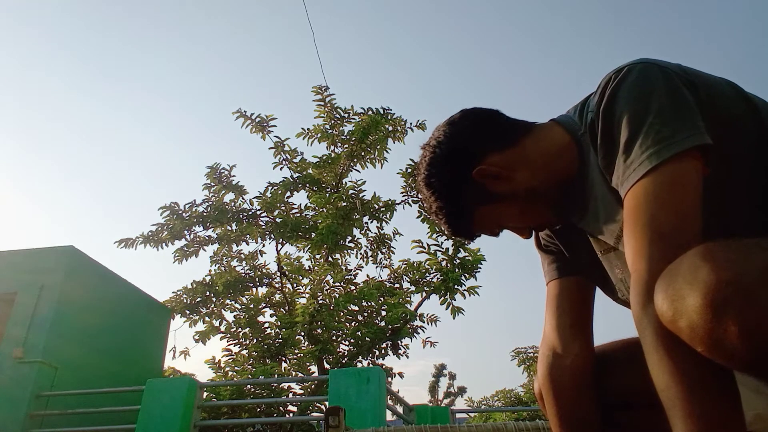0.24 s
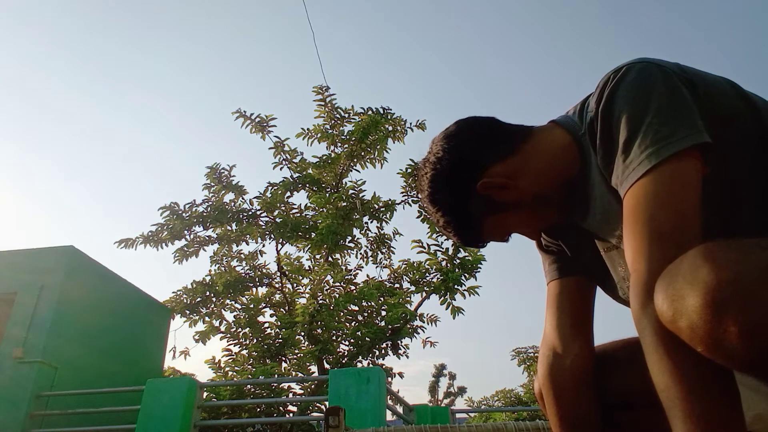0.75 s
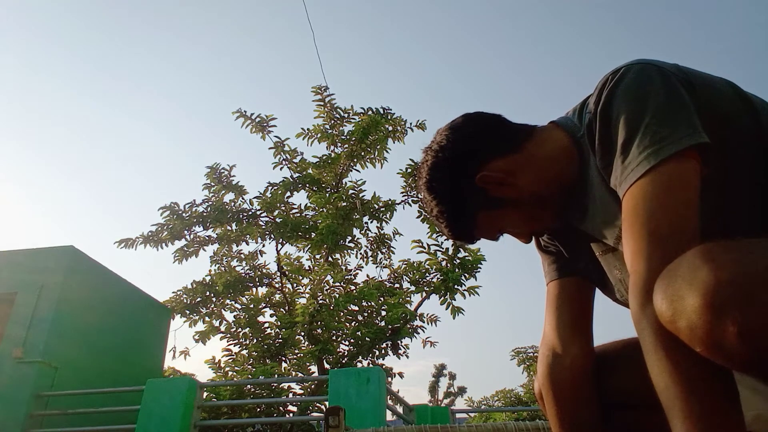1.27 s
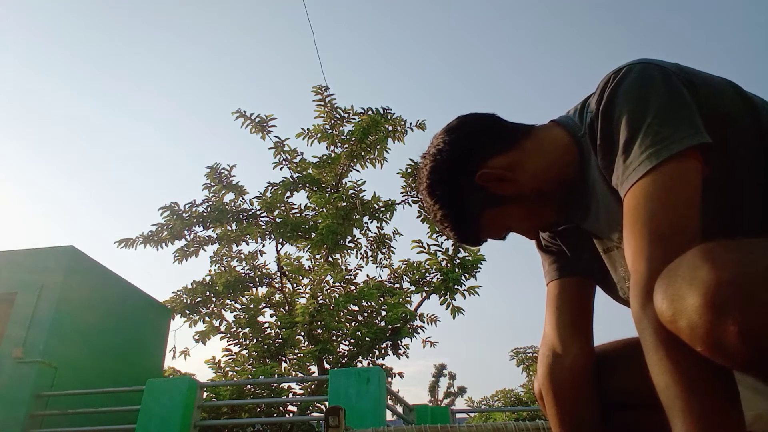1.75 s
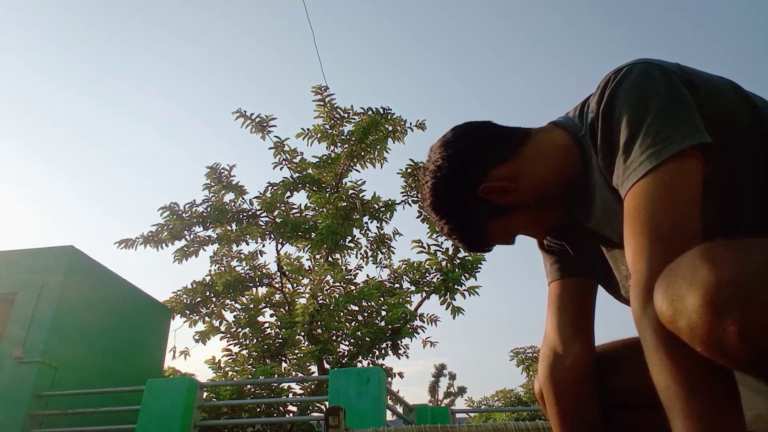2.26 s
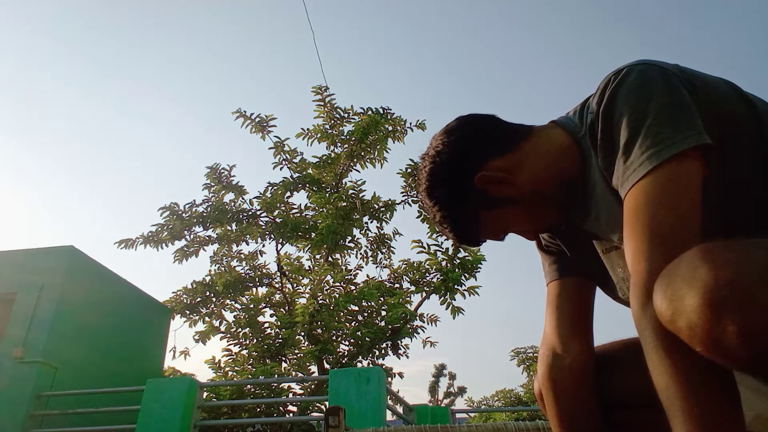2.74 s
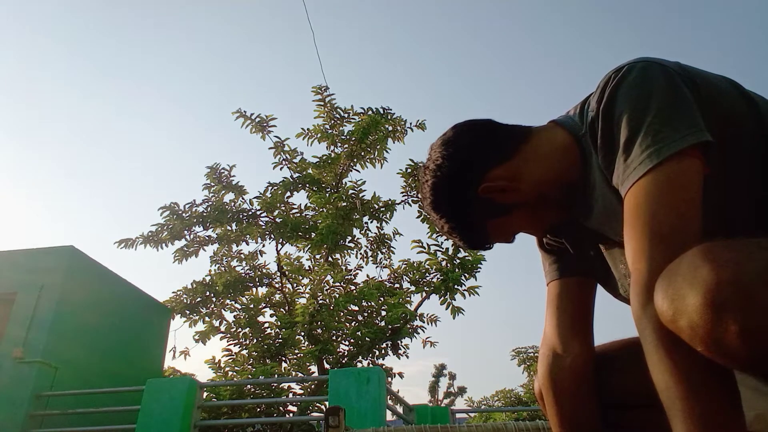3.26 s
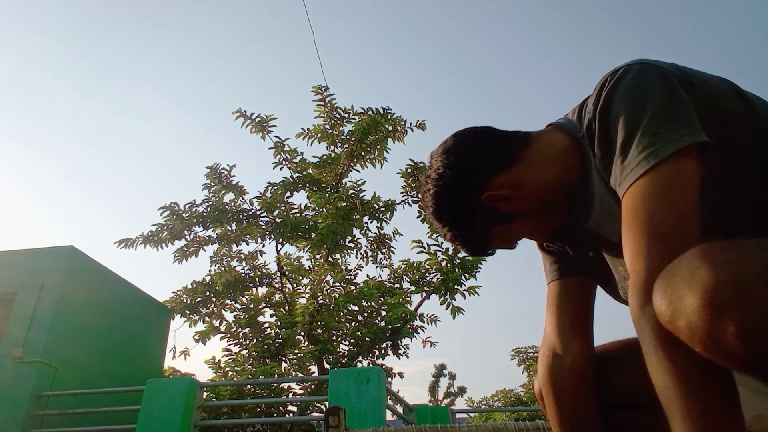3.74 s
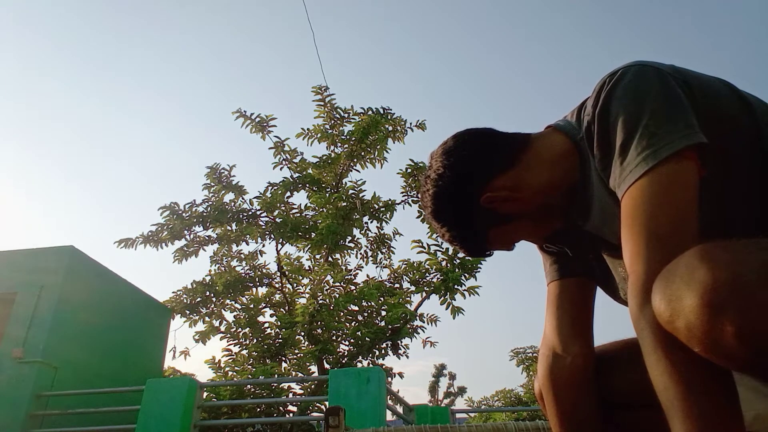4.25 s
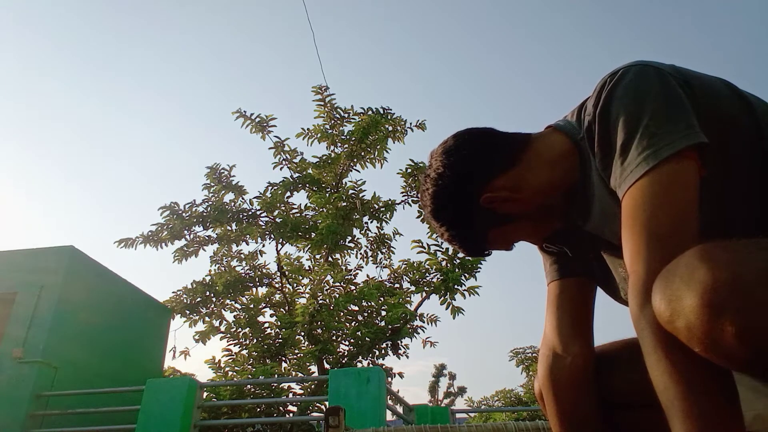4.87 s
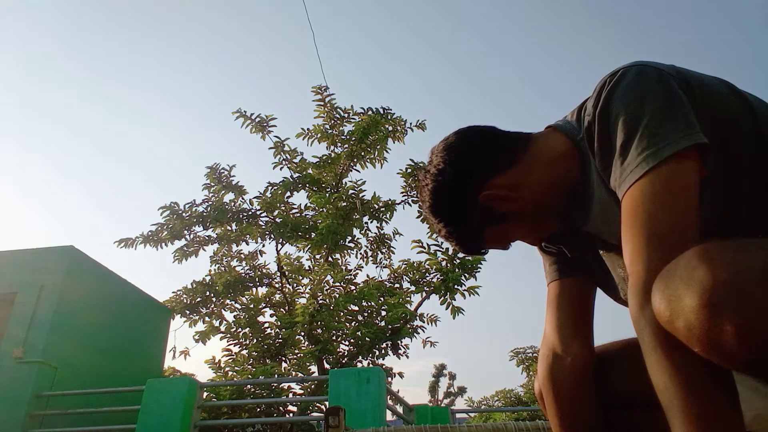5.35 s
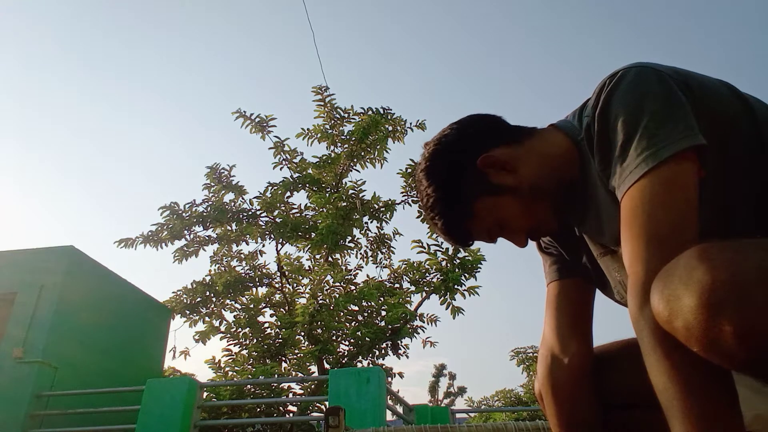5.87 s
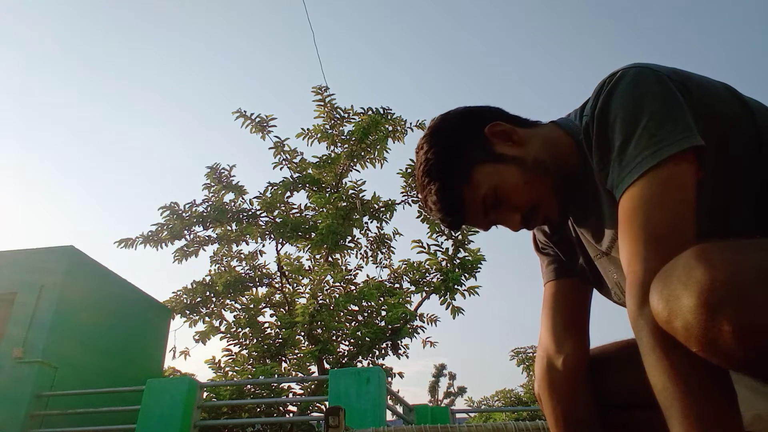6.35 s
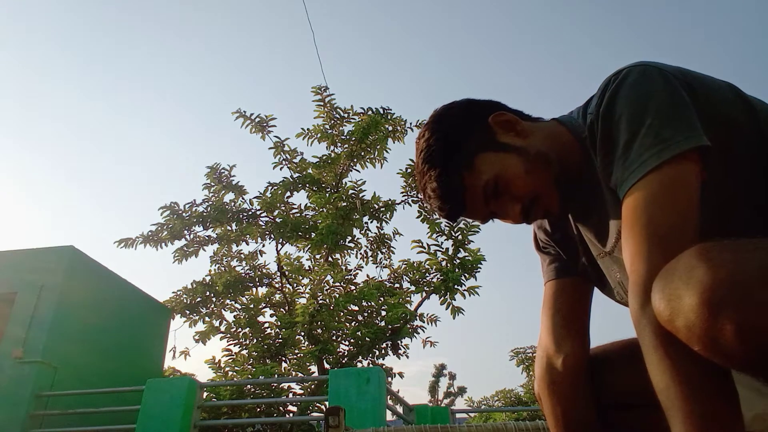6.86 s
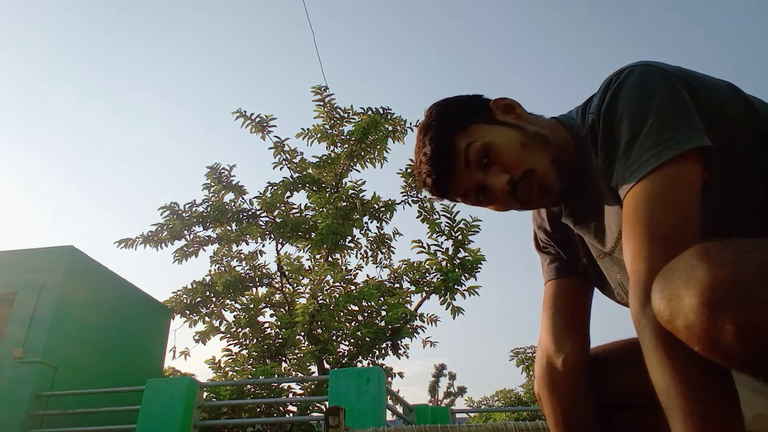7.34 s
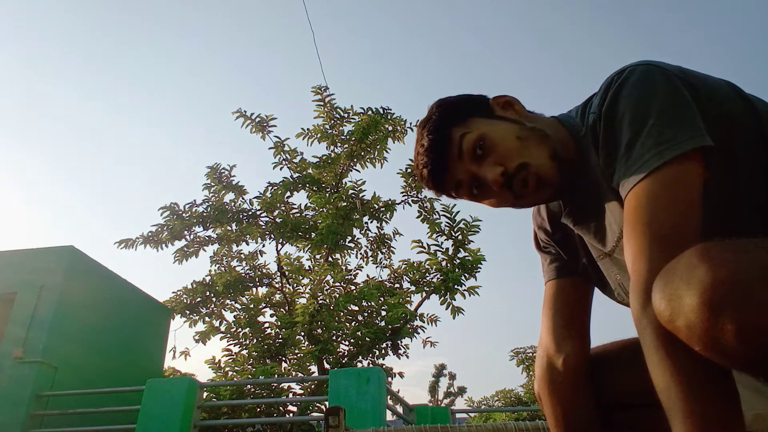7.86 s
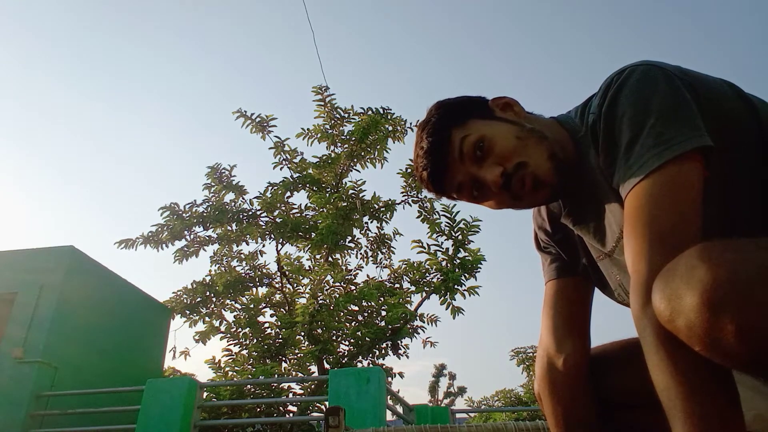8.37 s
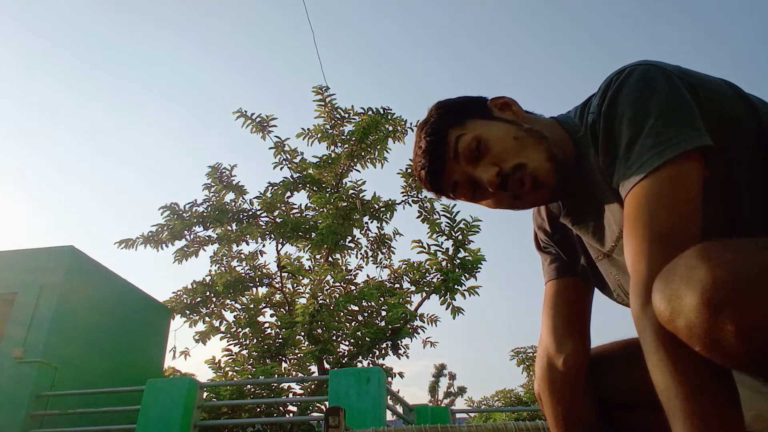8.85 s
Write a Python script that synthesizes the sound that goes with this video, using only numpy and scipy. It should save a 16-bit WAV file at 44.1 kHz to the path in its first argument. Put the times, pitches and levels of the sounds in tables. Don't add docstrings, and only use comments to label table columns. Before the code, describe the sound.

Phone microphone near the floor of an open terrace: a loud koel dominates, whooping upward from low to higher notes in four separate groups, with wall slap and reverberation from houses. Between groups, distant chirps, falling whistles and blurred chatter show through a quiet, steady bed of town rumble and airy hiss. One soft thud comes midway, a faint dove coos later, and brief hand scuffs close the scene.

```python
import sys
import numpy as np
from scipy import signal
from scipy.fft import next_fast_len
from scipy.io import wavfile
from scipy.ndimage import uniform_filter1d

SR = 44100
rng = np.random.default_rng(int(sys.argv[2]) if len(sys.argv) > 2 else 0)


def file_out(sig):
    cols = np.atleast_2d(sig).T
    lim = np.clip(cols, -1, 1)
    pcm = np.round(lim * 32767).astype(np.int16)
    wavfile.write(sys.argv[1], SR, pcm)


def gain_from_db(level_db):
    decades = np.asarray(level_db, float) / 20
    return 10 ** decades


N = 401751
LEAD = 13230
WARM = 4000

# (frequency [Hz], density [dB per Hz])
RUMBLE = [(15, -71), (25, -30), (33, -39.5), (48, -28), (51, -22.5), (61, -21), (81, 2.5), (129, -10.5),
          (166, -5.5), (195, -13.5), (221, -14), (261, -13), (500, -19), (650, -43.5), (1100, -120)]
# (time [s], level [dB rms])
RUMBLE_DB = [(0.0, -51.5), (0.46, -56), (0.58, -51.5), (5.96, -50.5), (7.0, -56), (7.15, -51.5),
             (8.37, -55.5), (8.98, -48.5), (9.11, -55)]
# (frequency [Hz], density [dB per Hz])
HAZE = [(250, -34.5), (400, -5), (600, -1.5), (1200, -7), (2500, -8.5), (3700, -15.5), (4600, -22.5),
        (5000, -26), (6300, -43), (7300, -37), (8300, -34.5), (9200, -40.5), (12000, -46.5), (15500, -46)]
# (time [s], level [dB rms])
HAZE_DB = [(0.0, -59), (9.11, -58)]

# (time [s], length [s], centre [Hz], width
# [Hz], level [dB rms])
RUSTLES = [(.5, 0.69, 4516, 828, -65.5), (1.26, 0.35, 2810, 1230, -58), (1.28, 0.35, 4900, 1120, -67.5),
           (1.3, 0.43, 7540, 1530, -75), (1.698, 0.32, 3300, 1750, -54.5), (2.172, 0.042, 6150, 2010, -68),
           (2.174, 0.2, 4530, 1223, -63), (3.049, 0.27, 2440, 1800, -65), (3.561, 0.31, 2170, 1710, -53),
           (4.26, 1, 2670, 1580, -66.5), (4.423, 0.47, 543.4, 79, -57.5), (4.428, 0.47, 759, 120, -58.5),
           (4.45, 0.2, 378, 122.2, -66), (4.97, 0.12, 4470, 1400, -58.5), (5.362, 0.15, 4300, 1600, -63),
           (5.754, 0.36, 2260, 1820, -56), (5, .4, 8200, 800, -84), (3.201, 0.31, 4630, 300, -78),
           (4.552, 0.45, 3270, 200, -66.5), (4.35, 0.74, 2104, 200, -66.5),
           (8.604, 0.48, 8100, 1986, -74.5)]
# (time [s], length [s], first pitch [Hz], last pitch [Hz], level [dB])
HIGH_BIRD = [
    (2.36, 0.18, 4190, 3887, -53.5),
    (3.6, .06, 4243, 3974, -60),
    (5.65, .17, 4180, 3855, -55.5),
    (8.27, 0.18, 4350, 3700, -52.5),
]
MIDDLE_BIRD = [
    (.975, .17, 3550, 3620, -53.5),
    (1.15, 0.16, 3226, 3070, -58.5),
]
LOW_BIRD = [
    (.56, 0.13, 2095, 2447, -49.5),
    (.92, 0.081, 2353, 2500, -58.5),
    (1.45, 0.2, 1737, 1930, -65),
    (1.58, 0.18, 1975, 2516, -55),
    (1.74, 0.13, 2330, 2170, -58.5),
    (2.3, 0.24, 1728, 2345, -55.5),
    (2.5, 0.17, 2516, 2700, -60),
    (2.63, 0.16, 2550, 2120, -63.5),
]
CHIRP = [
    (2.19, 0.037, 4840, 3330, -52),
    (2.23, 0.047, 3270, 2270, -53),
    (2.29, 0.12, 2280, 2185, -59),
    (2.18, 0.045, 4900, 4830, -54),
    (2.19, 0.0705, 2500, 2390, -57),
    (5.0, .1, 4307, 2570, -55.5),
]
THIN_BIRD = [
    (.55, 0.45, 4250, 3560, -71.5),
    (7.4, .1, 4100, 3400, -71),
    (7.14, 0.084, 2570, 2540, -58.5),
    (3.085, .07, 2700, 2940, -56),
]
DOVE = [
    (6.88, .4, 743, 723, -60.5),
    (7.8, .2, 695, 735, -59.5),
]
INSECT = [
    (1.6, .3, 8170, 8360, -74),
    (2.78, .3, 8300, 8300, -87),
    (3.36, 0.21, 8380, 8330, -87),
    (5.1, .2, 8300, 8300, -89),
]
SWELL, FADE_DB = 0.6, -7.5

# (time [s], length [s], level [dB rms], extra thud [dB])
SCUFFS = [
    (5.565, 0.083, -60, 9.5),
    (8.657, 0.057, -55.5, -19),
    (8.797, 0.032, -46, -16),
    (8.821, 0.042, -38.5, -6),
    (8.861, 0.063, -54, -6),
    (8.973, .024, -46.5, -2.5),
    (8.992, 0.059, -55, 3),
]
# (centre [Hz], width [Hz], level [dB])
SCUFF_BANDS = [
    (422, 360, 3),
    (2500, 3300, 2),
    (8000, 2200, -17),
    (11500, 8000, -22),
]

# (time [s], time to peak [s], first hump [Hz], peak [Hz], first hump effort [dB])
NOTES = [(-0.155, 0.1, 1213, 1420, -0.5), (0.078, 0.12, 1300, 1437, -1), (0.322, 0.12, 1366, 1466, 0),
         (3.553, .118, 750, 1225, -3), (3.785, 0.11, 1110, 1338, 0.5), (4.022, 0.12, 1265, 1406, -0.5),
         (5.717, 0.12, 821.7, 1259, 2), (5.955, 0.11, 1142, 1381, 1), (6.185, 0.11, 1297, 1445, 1),
         (6.424, .113, 1362, 1483, -1), (6.672, 0.11, 1395, 1513, -2), (7.582, .117, 1069, 1382, 0.5),
         (7.82, 0.12, 1335, 1498, -2), (8.071, .12, 1433, 1518, -6)]
# (time [s], length [s], first pitch [Hz], last pitch [Hz], level [dB])
HOARSE = [
    (3.55, 0.1, 1209, 1122, -43.5),
    (3.55, 0.11, 971, 896, -39.5),
    (5.72, .025, 1003, 1252, -46),
    (5.77, .04, 1030, 1326, -43),
    (7.6, .07, 3310, 3250, -56.5),
    (7.58, 0.088, 2870, 2760, -61),
]
CLEAR = [
    (7.6, 0.056, 1290, 1190, -25),
    (7.59, .08, 800, 800, -41),
    (7.569, 0.04, 760, 1100, -37.5),
    (3.7, .05, 830, 790, -33),
    (5.88, 0.062, 850, 800, -36),
]
# (frequency [Hz], fundamental [dB rms])
PIPE = [(650, -50.5), (850, -26), (1050, -25.5), (1200, -16.5), (1350, -12.5), (1500, -9)]
OVERTONES_DB = [-34.5, -38.5, -37, -31, -46, -46, -47.5, -50.5, -53, -51.5, -51.5, -56.5]
# (frequency [Hz], level [dB])
BEAK = [(1900, 1), (2030, 11), (2200, -9.5), (2420, -5), (2580, -22), (2820, 1), (3000, -5), (3300, 6.5),
        (3600, -0.5), (4200, -12.5), (5000, 2.5)]
WAVER, RASP_DB = .0015, 1.5
CLOSING_DB, DULL_BELOW_HZ = .27, 1060

ONSET, ONSET_S, SLIDE = .87, .013, .95
ONSET_DB, HUMP_S, HUMP_DB = -6.5, .036, 0.45
DIP, DIP_LEAD_S, DIP_DB = .925, 0.04484, 1.5
CREST, CREST_S = 0.95, .014
CLIMB_DB, PEAK_DB, BEND_DB, END_DB = -1, 1, 0.94, 7
BEND, BEND_AT, END = .84, .6, .67
FALL_S, FALL_PIVOT_HZ, FALL_S_PER_KHZ = .066, 1460, .125
LEAP_DB, CARRY = -11.5, 0.48

WALL_NOTCH_HZ = 1273.4
# (delay [s], level [dB])
ECHOES = [
    (0.0157, -29),
    (0.0218, -20.5),
    (0.034, -19),
    (0.047, -19.5),
    (0.072, -23.5),
]
# (frequency [Hz], time to fall 60 dB [s])
TAIL = [(820, 0.34), (980, 0.9), (1250, 0.65), (1480, .8), (2800, 0.5), (5500, 0.47), (8000, 0.59),
        (11000, 0.48)]
# (frequency [Hz], level [dB])
PORT = [(4350, -1.5), (4750, -12.5), (5500, -2.5), (7300, -11.5), (7700, -3), (8400, -2), (9200, -7.5),
        (10500, -2), (11700, -15), (13000, -13.5), (13700, 3), (15500, 3)]
KNEE_DB, EDGE_HZ = -2.5, 15500


def read(points, hz):
    f, value = np.transpose(points)
    return np.interp(np.log(hz + 1), np.log(f + 1), value)


def evened(x):
    return x / np.sqrt(np.mean(x ** 2) + 1e-20)


def add(mix, s, sound):
    part = mix[round(s * SR) + LEAD:][:len(sound)]
    part += sound[:len(part)]


def rounded(x, size):
    once = uniform_filter1d(x, size, mode="nearest")
    return uniform_filter1d(once, size, mode="nearest")


def drift(noise, size):
    return evened(uniform_filter1d(uniform_filter1d(noise, size), size))


def fuzz(hz, width_hz, noise, order=3):
    lowpass = signal.butter(order, width_hz / 2, fs=SR, output="sos")
    slow = signal.sosfilt(lowpass, noise[0] + 1j * noise[1])
    carrier = np.exp(2j * np.pi * np.cumsum(hz) / SR)
    return evened((slow * carrier).real)


def hazed(x, wet_db, t60):
    haze = rng.standard_normal(SR // 2) * gain_from_db(-60 * np.arange(SR // 2) / SR / t60)
    return x + gain_from_db(wet_db) * signal.oaconvolve(x, haze / np.linalg.norm(haze))[:len(x)]


def wash(colour, level, size, patchy_db):
    frames = 4 * N // size + 5
    hz = np.fft.rfftfreq(size, 1 / SR)
    a, b, patches = rng.standard_normal((frames, len(hz), 3)).T
    patches = uniform_filter1d(patches, 10, 0)
    patches = evened(uniform_filter1d(patches, 16384 // size, 1))
    z = (a + 1j * b) * gain_from_db(read(colour, hz)[:, None] + patchy_db * patches)
    noise = evened(signal.istft(z, nperseg=size, noverlap=3 * size // 4)[1][:N])
    return noise * gain_from_db(np.interp(np.arange(N) / SR, *np.transpose(level)))


def town():
    rumble = wash(RUMBLE, RUMBLE_DB, size=4096, patchy_db=1.0)
    haze = wash(HAZE, HAZE_DB, size=1024, patchy_db=1.7)
    return rumble + haze


def rustles():
    out = np.zeros(N + LEAD)
    for s, length, hz, width, db in RUSTLES:
        n = round(length * SR)
        noise = rng.standard_normal((2, SR))[:, :n]
        burst = fuzz(np.full(n, hz), width, noise)
        add(out, s, gain_from_db(db) * burst * signal.windows.tukey(n, .5))
    return hazed(out, wet_db=-0.5, t60=0.49)


def whistles(table, blur_hz):
    out = np.zeros(N + LEAD)
    for s, length, first_hz, last_hz, db in table:
        u = np.arange(-WARM, round(length * SR)) / SR / length
        noise = rng.standard_normal((2, SR))[:, :len(u)]
        glide_hz = first_hz + (last_hz - first_hz) * u
        tone = fuzz(glide_hz, max(blur_hz, 10), noise)[WARM:]
        level_db = db + FADE_DB * abs(u[WARM:] - SWELL)
        add(out, s, gain_from_db(level_db) * evened(tone) * signal.windows.tukey(len(tone), .4))
    return out


def far_birds():
    birds = whistles(HIGH_BIRD, blur_hz=30.44) + whistles(MIDDLE_BIRD, blur_hz=262)
    birds += whistles(LOW_BIRD, blur_hz=200) + whistles(CHIRP, blur_hz=400)
    birds += whistles(THIN_BIRD, blur_hz=80) + whistles(DOVE, blur_hz=25)
    birds += whistles(INSECT, blur_hz=300)
    return hazed(birds, wet_db=1.0, t60=.38)


def scuffs(grain_db=1.0):
    out = np.zeros(N + LEAD)
    for s, length, db, thud_db in SCUFFS:
        n = round(length * SR)
        noise = rng.standard_normal((9, SR // 4))[:, :n]
        stroke = np.zeros(n)
        for k, (hz, width, band_db) in enumerate(SCUFF_BANDS):
            level = gain_from_db(band_db + thud_db * (k == 0))
            stroke += level * fuzz(np.full(n, hz), width, noise[2 * k:], order=2)
        grains = gain_from_db(db + grain_db * drift(noise[8], size=60))
        add(out, s, grains * stroke * signal.windows.tukey(n, .8))
    return hazed(out, wet_db=-4.5, t60=0.36)


def contour(s, rise, hump_hz, peak_hz, effort_db):
    top = s + rise
    fall = FALL_S + FALL_S_PER_KHZ * (peak_hz - FALL_PIVOT_HZ) / 1e3
    thin_db = LEAP_DB * np.log2(peak_hz / hump_hz)
    late_db = CARRY * effort_db
    return [(s, ONSET * hump_hz, effort_db + ONSET_DB),
            (s + ONSET_S, SLIDE * hump_hz, effort_db),
            (s + HUMP_S, hump_hz, effort_db + HUMP_DB),
            (top - DIP_LEAD_S, DIP * hump_hz, effort_db + DIP_DB + thin_db),
            (top - CREST_S, CREST * peak_hz, late_db + CLIMB_DB + .15 * thin_db),
            (top, .985 * peak_hz, late_db + PEAK_DB),
            (top + CREST_S, CREST * peak_hz, late_db + PEAK_DB),
            (top + BEND_AT * fall, BEND * peak_hz, late_db + BEND_DB),
            (top + fall, END * peak_hz, END_DB)]


def columns(rows):
    s, *values = np.transpose(rows)
    t = np.arange(s[0], s[-1], 1 / SR)
    return s[0], [np.interp(t, s, v) for v in values]


def note(rows, patchy_db=4.0, release=0.011, puff_db=-29):
    s, (hz, effort_db) = columns(rows)
    noise = rng.standard_normal((3 + len(OVERTONES_DB), SR // 4))[:, :len(hz)]
    t = np.arange(len(hz)) / SR
    hz = rounded(hz, size=500) * (1 + WAVER * drift(noise[0], size=150))
    turn = 2 * np.pi * np.cumsum(hz) / SR
    flicker_db = patchy_db * drift(noise[3:], size=220) + RASP_DB * drift(noise[3:], size=30)

    falling = np.maximum(-np.gradient(hz) * SR / 2000, 0)
    low = np.maximum(DULL_BELOW_HZ - hz, 0) / 40
    closing = CLOSING_DB * (falling + low)
    overtones = np.zeros(len(hz))
    for k, db in enumerate(OVERTONES_DB, 2):
        overtone_db = db + read(BEAK, k * hz) + flicker_db[k - 2] - k * closing
        overtones += gain_from_db(overtone_db) * np.cos(k * turn + k * k) * (k * hz < SR / 2.5)

    level_db = rounded(effort_db, size=300) + read(PIPE, hz)
    level = gain_from_db(level_db) * signal.windows.tukey(len(hz), .09)
    level = level * np.minimum(t[::-1] / release, 1)
    opening = np.exp(-(t / .015) ** 2)
    breath = fuzz(1850 + 0 * hz, 1300, noise[1:3], order=2)
    puff = gain_from_db(puff_db + read(PIPE, hz[600])) * breath * opening
    return s, np.sqrt(2) * level * (np.cos(turn) + overtones) + puff


def koel():
    out = whistles(HOARSE, blur_hz=151.4) + whistles(CLEAR, blur_hz=15)
    for row in NOTES:
        add(out, *note(contour(*row)))
    return out


def walls(x, wall_db=2.0, wall_hz=4500, tail_db=-11):
    early = np.zeros(4096)
    early[round(10.5 / WALL_NOTCH_HZ * SR)] = gain_from_db(wall_db)
    for s, db in ECHOES:
        early[round(s * SR)] = gain_from_db(db)
    early = signal.lfilter(*signal.butter(1, wall_hz, fs=SR), early)

    taps = np.zeros(SR)
    at = np.arange(900, SR - 20, 20)
    taps[at + rng.integers(0, 20, len(at))] = rng.choice([-1., 1.], len(at))
    hz, t, z = signal.stft(taps, SR, nperseg=256)
    decay = gain_from_db(-60 * t / read(TAIL, hz)[:, None])
    tail = signal.istft(z * decay, SR, nperseg=256)[1]
    tail *= gain_from_db(tail_db) / np.linalg.norm(tail)
    return x + signal.oaconvolve(x, early)[:len(x)] + signal.oaconvolve(x, tail)[:len(x)]


def port(x):
    hz = np.linspace(0, SR / 2, 257)
    colour = signal.firwin2(511, hz, gain_from_db(read(PORT, hz)), fs=SR)
    return signal.oaconvolve(x, colour, "same")


def scene():
    near = walls(koel()) + far_birds() + rustles() + scuffs()
    return (port(near)[LEAD:] + town())[None]


def gain_control(x, ratio=3.3):
    envelope = abs(signal.hilbert(x, next_fast_len(N))[:, :N])
    peak_db = 20 * np.log10(envelope + 1e-9)
    over_db = np.maximum(peak_db - KNEE_DB, 0) * (1 - 1 / ratio)
    return x / gain_from_db(rounded(over_db, size=90))


def low_pass(x):
    return signal.sosfilt(signal.butter(12, 15980, fs=SR, output="sos"), x)


def record(dry):
    edge = signal.firwin(511, EDGE_HZ, window=("kaiser", 9), fs=SR)
    mix = signal.oaconvolve(gain_control(dry), edge[None], "same")
    return low_pass(mix)


dry = scene()
out = record(dry)
file_out(out)
```